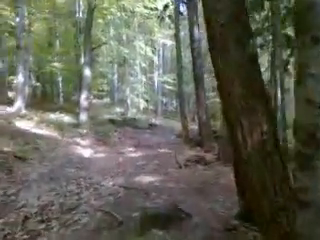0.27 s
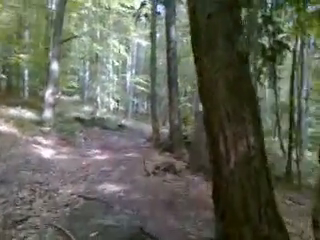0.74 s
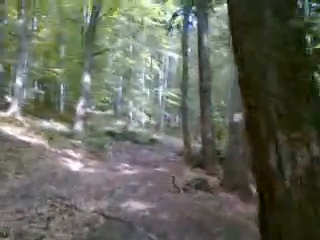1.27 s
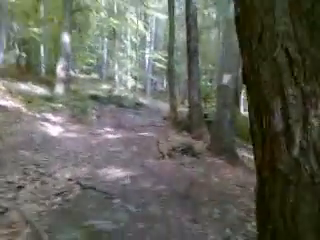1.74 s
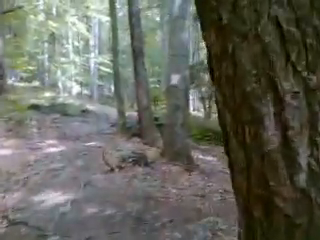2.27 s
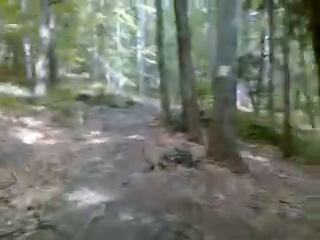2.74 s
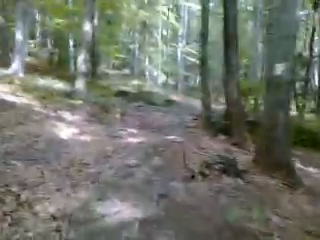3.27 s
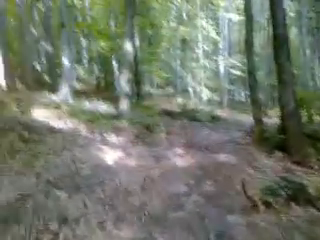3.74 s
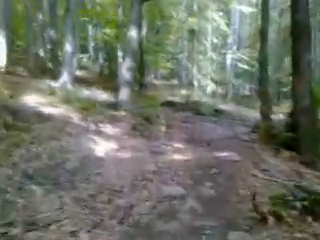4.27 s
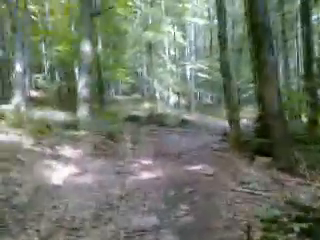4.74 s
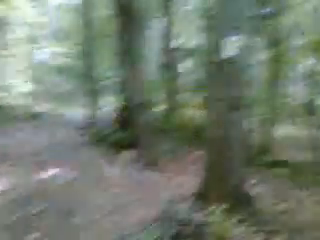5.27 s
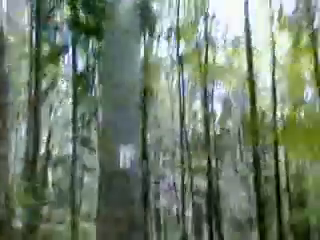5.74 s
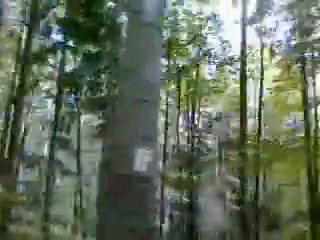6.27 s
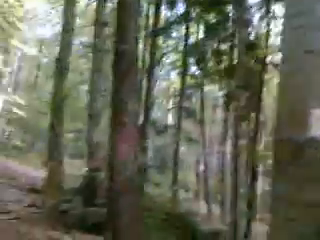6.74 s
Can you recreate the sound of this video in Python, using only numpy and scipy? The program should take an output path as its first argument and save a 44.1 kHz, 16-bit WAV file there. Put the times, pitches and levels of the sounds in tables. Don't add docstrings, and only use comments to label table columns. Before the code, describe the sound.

Uneven walking over crisp leaf litter, with sharp stick cracks, pebble knocks and dull heel thuds, and a bird's echoing chips, trill and buzzy flourish.

```python
import sys
import numpy as np
from scipy import signal
from scipy.fft import rfft, irfft, next_fast_len
from scipy.io import wavfile
from scipy.ndimage import uniform_filter1d, map_coordinates

SR = 44100
rng = np.random.default_rng(int(sys.argv[2]) if len(sys.argv) > 2 else 0)


def voltage_ratio(level):
    return 10 ** (np.asarray(level, float) / 20)


def to_wav(s):
    ch = np.atleast_2d(s).T
    pcm = np.round(np.clip(ch, -1, 1) * 32767)
    wavfile.write(sys.argv[1], SR, pcm.astype(np.int16))


N = 308372

# peak_s, length_s, leaf body level_db, crisp edges over body_db, grit over body_db
BURSTS = [(.589, 0.033, -45, -8.5, -32), (1.299, 0.081, -48.5, -11, -10.5), (1.389, 0.058, -38, -7, -7),
          (5.971, .02, -58, -6, 3), (2.361, 0.038, -44.5, -2, -17.5), (2.986, 0.025, -58, -7, -4),
          (2.789, 0.011, -66, 6.5, -4), (3.257, 0.0088, -51, 0, 4.5), (4.15, 0.1, -55.5, -3.5, -7.5),
          (4.109, 0.012, -39.5, -12, -20), (5.385, 0.036, -55.5, 1, -9), (6.67, 0.11, -52.5, 1, -8.5),
          (4.717, 0.13, -46, -4.5, -7.5), (4.781, 0.042, -39.5, -7, -12.5), (5.214, 0.1, -37, -5, -7.5),
          (5.492, 0.03, -47, -3.5, 0), (6.405, 0.042, -42.5, 1.5, -13.5), (6.795, 0.17, -52.5, -2.5, -3.5)]
CRUSHES = [(.81, 0.087, -54.5, -1, -12), (1.48, 0.059, -41, -4, -6), (1.715, 0.062, -36.5, -7, -6),
           (1.785, 0.1, -41, -2.5, -5), (1.855, 0.053, -38.5, -6.5, -8), (1.955, 0.014, -45, -8.5, -18),
           (1.993, 0.033, -44.5, -0.5, -16), (2.02, 0.029, -43, -0.5, -16.5), (2.15, 0.19, -56, -10.5, -15),
           (3.222, 0.041, -50, -4, -6), (4.05, 0.11, -66, -0.5, 2), (4.31, 0.036, -46.5, -4, -3.5),
           (4.365, 0.048, -40, -2.5, -9), (6.06, 0.1, -62, -6.5, -25), (5.57, .04, -56, -8, -10),
           (5.625, 0.052, -47, -1, -11.5), (5.692, 0.037, -44, -3, -4.5), (5.75, 0.079, -49.5, -1.5, -4),
           (5.82, 0.1, -54.5, 1, -9), (5.905, 0.055, -55.5, 4, -2.5), (6.025, 0.047, -48, 0, -4),
           (6.69, 0.028, -55, -3, -12), (6.428, .03, -43, -4, -10), (1.84, .03, -55, -8, 12),
           (5.53, 0.035, -44.5, 0.5, -10.5), (6.465, 0.077, -41.5, -4.5, -8.5),
           (6.555, 0.066, -49.5, -2.5, -8)]
BRUSHES = [(.23, 0.15, -62, -8, -8), (.578, 0.0077, -57.5, -2, -16), (3.246, 0.0083, -63, -12, -3),
           (1.925, .06, -47.5, -0.5, -23), (.995, 0.036, -45, -1.5, -0.5), (1.16, 0.06, -51, -7, -4),
           (1.6, 0.084, -55.5, 0.5, -4), (2.438, 0.044, -69.5, -5, 14), (2.785, 0.12, -78, 5, 11.5),
           (3.04, 0.05, -69, -9, 10.5), (3.095, 0.07, -53, -2.5, -12), (3.31, 0.091, -82, -8, 13),
           (3.408, 0.033, -56, -8.5, -1.5), (4.895, 0.032, -43, -3, -5.5), (4.94, 0.01, -53, -3.5, -9),
           (4.999, 0.048, -59.5, 1, -2.5), (5.328, 0.044, -42.5, -10, -24.5), (6.268, 0.061, -51.5, -5, -8),
           (6.755, 0.011, -67, -9, 10)]
SCUFFS = [(3.261, 0.011, -41, -1, -11.5), (3.546, 0.021, -54, -8, -4), (4.135, 0.022, -36, -6, -16),
          (4.493, 0.05, -49, -6, -11), (5.115, 0.03, -44, -8, -20), (2.884, .017, -55, -4, 4),
          (5.51, .025, -45, -3, -3), (5.17, 0.035, -49, -7, -22), (5.33, .042, -40.5, -6.5, -14.5),
          (6.222, 0.026, -62.5, -15, -0.5), (6.83, 0.048, -52.5, -5, -12),
          (3.998, 0.0057, -46, -12.5, -11.5), (.78, 0.015, -62, -8, 0)]
# start_s, peak_db, sharpness_db
SNAPS = [(.1605, -51, -10), (.2144, -28, -18.5), (.7477, -37.5, -14.5), (.811, -29, -17),
         (1.5404, -38, -10.5), (1.5655, -35.5, -9.5), (2.357, -43, -7), (2.6977, -50, -9),
         (2.821, -52, -23), (2.7656, -47.5, -15), (2.7865, -54.5, -0.5), (3.364, -33, -21),
         (3.7893, -57, -26), (3.9142, -44, -20), (3.98, -45.5, -17.5), (5.38, -42, -12), (6.412, -30, -15),
         (6.455, -30, -14), (6.477, -32, -14), (6.803, -34, -20), (4.8403, -41.5, -5), (4.999, -32.5, -14),
         (5.879, -38, -7.5), (6.113, -36, -14.5), (6.4029, -16.5, -27), (6.6687, -34, -15)]
# start_s, peak_db, sharpness_db, knock over snap_db, knock_hz
STICKS = [(0.583, -11, -9.5, -38, 2280), (1.293, -21, -25, -16, 610), (1.381, -18, -23, -7.5, 1510),
          (1.4482, -13, -21, 2, 2450), (3.252, -7, -18, -8, 1165), (4.116, -13, -14, -8, 1870),
          (4.521, -27, -18, -2, 1520), (4.693, -10.5, -18, -14, 2350), (4.712, -8, -17, -13, 1340),
          (4.7715, -0.5, -19, -20, 1700), (5.2087, -2.5, -18.5, -10.5, 1600),
          (6.3898, -25.5, -19.5, -13.5, 1070), (6.79, -20, -16, -8, 1110)]
# start_s, peak_db, pitch_hz
KNOCKS = [(.199, -40, 1030), (.333, -52, 961), (.157, -50, 650), (.216, -47, 1300), (.234, -55, 2000),
          (.284, -55, 750), (.525, -56, 900), (.876, -52, 1600), (.918, -52, 1000), (.768, -41, 1860),
          (.994, -44, 1770), (1.08, -40.5, 620), (1.168, -26, 900), (1.449, -26, 910), (1.065, -51, 650),
          (1.501, -33, 1220), (1.565, -32, 1810), (2.096, -46, 990), (2.181, -44, 1600), (2.668, -53, 610),
          (2.747, -47, 686), (2.752, -52, 770), (2.762, -48, 700), (2.808, -50, 1500), (2.79, -51, 600),
          (2.798, -52, 600), (2.823, -53, 650), (3.014, -56, 1940), (3.026, -43, 1750), (5.565, -44, 900),
          (5.708, -31, 1800), (2.875, -48, 1200), (3.044, -48, 1100), (3.06, -47, 1300), (2.993, -50, 2000),
          (3.709, -37, 500), (4.031, -41.5, 487), (4.217, -42.5, 1050), (4.363, -34.5, 920),
          (4.728, -30, 590), (4.888, -23, 1550), (5.0215, -32, 1740), (5.4755, -34, 1100),
          (5.487, -25, 755), (5.497, -28, 760), (5.5005, -28, 800), (5.5035, -27, 760), (5.974, -44, 810),
          (5.55, -42, 900), (1.698, -33, 1400)]
# start_s, peak_db, pitch_hz, t60_s
PINGS = [(.5235, -46, 1950, .01), (.583, -24, 2150, .009), (1.168, -33, 1800, .008),
         (5.9915, -30, 1800, .012), (2.881, -47, 2000, .012), (2.886, -47, 1850, .012),
         (3.461, -40, 950, .013), (4.6675, -37, 3850, .014), (4.762, -40, 3800, .012),
         (5.504, -36, 1950, .01), (3.709, -33, 950, .016), (3.709, -38, 1470, .014),
         (3.709, -40, 1950, .014)]
# start_s, peak_db, pitch_hz
THUDS = [(0.052, -42.5, 274), (0.157, -56, 264), (0.99, -45, 406), (1.129, -45, 390), (1.147, -52, 350),
         (.2, -51.5, 250), (0.284, -67, 402), (4.899, -48.5, 153), (1.162, -48, 300), (1.379, -38.5, 385),
         (2.074, -58, 183), (2.161, -50, 250), (2.433, -52.5, 468), (2.657, -46.5, 420),
         (2.765, -54.5, 517), (3.247, -39.5, 362), (3.351, -47, 194), (3.394, -42, 300), (3.405, -37, 230),
         (3.418, -42, 200), (3.458, -50, 183), (3.707, -39.5, 228), (4.028, -42, 301), (4.047, -50, 300),
         (4.058, -48, 210), (4.072, -51, 380), (4.092, -46, 200), (4.107, -45, 400), (4.214, -54, 180),
         (4.242, -55, 190), (4.592, -32.5, 185), (4.724, -39, 294), (5.207, -36.5, 452), (5.484, -54, 444),
         (5.893, -41.5, 285), (5.995, -26, 202), (6.557, -34.5, 226), (6.785, -41, 362), (6.877, -48, 187)]
# time_s, soil_db, buffet_db
GROUND = [(0.0, -87, -92), (1.4, -76, -86), (1.84, -70, -83), (1.9, -88, -88), (2.05, -88, -88),
          (2.12, -78, -88), (2.49, -85.5, -91.5), (4.67, -85.5, -88), (5.46, -84.5, -87), (5.5, -68, -90),
          (5.76, -68, -92), (5.98, -73, -87), (6.21, -78, -89), (6.38, -82, -88), (6.42, -68, -86),
          (6.64, -72, -86), (6.99, -85, -98)]
# peak_s, length_s, level_db
JOLTS = [(.06, .06, -92.5), (0.775, 0.025, -70), (0.996, 0.054, -89), (1.168, 0.033, -77), (1.46, .12, -74),
         (1.627, 0.068, -77), (1.82, .05, -86), (2.127, 0.072, -68), (3.29, 0.06, -70.5),
         (3.42, 0.043, -64), (3.727, 0.022, -70), (4.083, 0.09, -64), (4.383, 0.038, -71.5),
         (4.608, .04, -67), (4.75, 0.17, -75), (5.253, .05, -67.5), (5.5, 0.054, -78), (5.916, 0.037, -67),
         (6.01, 0.068, -66), (6.4, 0.04, -85), (6.574, 0.045, -68), (6.807, 0.057, -89)]

# start_s, level_db
CHIPS = [
    (.327, -64),
    (.471, -66),
    (.614, -52),
    (.76, -43),
]
# start_s, length_s, start_hz, end_hz, level_db
SLIDES = [
    (.26, .07, 6290, 5720, -72.5),
    (0.391, .07, 6230, 5750, -64),
    (0.682, .04, 6350, 5600, -59),
    (.735, 0.064, 6100, 5840, -57),
]
# falling note_db, landing pitch_hz, rising note_db
TRILL = [(-45, 3650, -40), (-43, 3800, -39), (-41, 3680, -37), (-39, 3750, -41), (-35, 3720, -42),
         (-36, 3780, -43), (-36, 3720, -45)]
# start_s, length_s, start_hz, end_hz, level_db
NOTES = [
    (1.215, 0.04, 3880, 3800, -39),
    (1.232, .017, 3900, 4800, -45.5),
    (1.24, 0.075, 4780, 4700, -49),
    (1.272, 0.019, 3420, 3680, -33),
    (1.774, 0.0087, 3730, 3830, -42),
    (1.848, 0.014, 3980, 3900, -50),
    (6.543, 0.097, 6600, 5670, -59),
]
BUZZES = [
    (1.289, 0.075, 3300, 2750, -43),
    (1.358, .27, 3644, 3347, -47.5),
    (1.895, 0.15, 3220, 4294, -42),
    (2.093, 0.082, 5490, 4620, -45.5),
    (2.175, 0.045, 4000, 3490, -45),
    (2.215, 0.09, 3625, 2846, -54),
]
CHEVRONS = [(6.572, .014, 4500, 5100, -55), (6.588, .016, 5150, 4700, -56), (6.727, .017, 4100, 5200, -46),
            (6.746, .023, 5000, 4100, -43), (6.871, .009, 5700, 4900, -48), (6.884, .01, 3400, 4100, -48),
            (6.888, .013, 3950, 4650, -40), (6.899, .007, 4800, 5600, -49),
            (6.907, .018, 4650, 3950, -36.5), (6.936, .016, 5150, 5800, -50)]
# time_s, echo over direct song_db
ECHO = [(0, 6), (.75, 5), (.85, .5), (1.2, .5), (1.4, 3), (3, 2.5), (7, -3)]
# frequency_hz, t60_s
TRUNKS = [(2500, 0.49), (4000, 0.33), (7000, 0.32)]

# frequency_hz, density_db per Hz
CRISP = [(3500, -54.5), (4800, 1.5), (5600, 7), (9000, -1)]
BODY = [(1500, -30), (2300, -8), (3000, -4), (4300, 0.5), (5200, -0.5), (6500, -41.5)]
GRIT = [(80, -35), (200, -15), (500, -6), (900, -1.5), (1800, 3), (2500, 0.5), (3500, -40)]
SPLINTER = [(3500, -54.5), (4800, 1.5), (5600, 7), (7000, 4), (9000, -8)]
CRUMB = [(60, -25.5), (130, -5), (250, -2.5), (500, -14), (900, -28), (2000, -38.5)]
SOIL = [(60, -37.5), (110, -11), (170, -10), (400, -7), (700, -15.5), (1500, -39)]
BUFFET = [(15, -24.5), (30, -9.5), (48, 1), (75, -5.5), (100, -10.5), (200, -59)]
HUSH = [(59, -42), (100, -9), (376, -18), (461, -9), (1150, -15), (1390, -10), (2430, -8), (3790, 1),
        (4840, -12), (6400, -1), (8620, -22), (11200, -62.5), (19000, -120)]
# frequency_hz, gain_db
MIC = [(60, -39), (105, -10.5), (170, -4.5), (1800, -7), (2660, -7.5), (3900, -1.5), (5200, -16),
       (6400, -3), (6800, -4), (7400, -9), (8500, -24.5), (9000, -35), (10000, -100)]
# frequency_hz, width_hz
NULLS = [(7010, 210), (8000, 330), (8000, 170)]


def along(points, hz):
    f, v = np.transpose(points)
    return np.interp(np.log(hz + 1), np.log(f + 1), v)


def curves(rows):
    s, *cols = np.transpose(rows)
    return [np.interp(np.arange(N) / SR, s, c) for c in cols]


def unit(x):
    return x / np.sqrt(np.mean(x ** 2) + 1e-20)


def wobble(rate):
    knots = rng.standard_normal(int(N * rate / SR) + 4)
    return map_coordinates(knots, [np.arange(N) * rate / SR])


def coloured(x, gain_db):
    m = 2 * next_fast_len(N // 2 + 4096)
    gain = voltage_ratio(gain_db(np.fft.rfftfreq(m, 1 / SR)))
    cepstrum = irfft(np.log(gain + 1e-6), m)
    causal = np.concatenate([cepstrum[:1], 2 * cepstrum[1:m // 2], np.zeros(m // 2)])
    return irfft(rfft(x, m) * np.exp(rfft(causal)), m)[:N]


def add(track, s, sound):
    part = track[round(s * SR):][:len(sound)]
    part += sound[:len(part)]


def crackle(spectrum, rate, spread_db, grainy):
    happens = rng.random(N) < rate / SR
    breaks = happens * voltage_ratio(spread_db * rng.exponential(size=N)) * rng.standard_normal(N)
    mix = grainy * unit(breaks) + rng.standard_normal(N)
    return unit(coloured(mix, lambda hz: along(spectrum, hz)))


def patchy(x, depth_db):
    z = signal.stft(x, nperseg=256)[2]
    field = uniform_filter1d(rng.standard_normal(z.shape), size=4, axis=0)
    field = uniform_filter1d(field, size=14, axis=1)
    return unit(signal.istft(z * voltage_ratio(depth_db * unit(field)), nperseg=256)[1][:N])


def tread():
    fade_db, settle_db, settle_db_per_s = 22, -27.5, 108
    kinds = [(BURSTS, 0.34, 1.065), (CRUSHES, 1.11, 1.88), (BRUSHES, 1.31, 1.01), (SCUFFS, 1.05, 4.5)]
    s = np.arange(0, N / SR + .01, .001)
    total = voltage_ratio(-110.)
    for rows, rise, roundness in kinds:
        peak_s, length, db, crisp_db, grit_db = np.transpose(rows)[..., None]
        t = s - peak_s
        side_s = length * np.where(t < 0, rise, 1)
        load = voltage_ratio(-fade_db * (abs(t) / side_s) ** roundness)
        load = load + (t > 0) * voltage_ratio(settle_db - settle_db_per_s * abs(t))
        layers = [(voltage_ratio(db + over) * load).sum(axis=0) for over in (0, crisp_db, grit_db)]
        total = total + np.array(layers)
    return curves(np.column_stack([s, *(20 * np.log10(total))]))


def litter():
    body_db, crisp_db, grit_db = tread()
    press_db = 1.8 * wobble(45) + 1.13 * wobble(160)
    crisp = patchy(crackle(CRISP, 1400, spread_db=3.0, grainy=0.58), depth_db=2.5)
    body = patchy(crackle(BODY, 1500, spread_db=0.5, grainy=0.68), depth_db=2.0)
    grit = patchy(crackle(GRIT, 900, spread_db=2.5, grainy=0.51), depth_db=3.5)
    mix = voltage_ratio(crisp_db + 11) * crisp + voltage_ratio(body_db + 3.5) * body + voltage_ratio(grit_db + 6.5) * grit
    return voltage_ratio(press_db) * mix


def snaps():
    dull, sharp, t = np.zeros(N), np.zeros(N), np.arange(SR // 10) / SR
    breaks = SNAPS + [stick[:3] for stick in STICKS]
    splinters, spray = voltage_ratio(-14 - 60 * t / .004), voltage_ratio(-33 - 60 * t / .05)
    for s, db, sharp_db in breaks:
        burst = (splinters + spray) * rng.standard_normal((2, len(t)))
        burst[:, 0] = 1
        add(dull, s, voltage_ratio(db + 16.0) * burst[0])
        add(sharp, s, voltage_ratio(db + sharp_db + 27.0) * burst[1])
    dull = coloured(dull, lambda hz: along(BODY, hz))
    return dull + coloured(sharp, lambda hz: along(SPLINTER, hz))


def knocks():
    bend_s = .0006
    out, t = np.zeros(N), np.arange(SR // 20) / SR
    hits = KNOCKS + [(s - bend_s, db + over_db, hz) for s, db, _, over_db, hz in STICKS]
    for s, db, hz in hits:
        cycles = hz * t
        ring = np.cos(2 * np.pi * cycles) * voltage_ratio(-13 * cycles)
        ring += 0.29 * np.sin(2 * np.pi * 1.95 * cycles) * voltage_ratio(-17 * cycles)
        ring *= 1 - np.exp(-cycles / 0.52)
        late, weaker = rng.random(2)
        add(out, s, voltage_ratio(db + 13) * ring)
        add(out, s + .001 + 0.00286 * late, -voltage_ratio(db + 7 - 10 * weaker) * ring)
    return coloured(out, lambda hz: along([(80, -24), (400, 1.0)], hz))


def pings():
    out, t = np.zeros(N), np.arange(SR // 20) / SR
    for s, db, hz, t60 in PINGS:
        envelope = voltage_ratio(db + 9 - 60 * t / t60) * (1 - np.exp(-t / .0008))
        add(out, s, envelope * np.sin(2 * np.pi * hz * t))
    return out


def thuds():
    out, earth, t = np.zeros(N), np.zeros(N), np.arange(SR // 4) / SR
    rise = 1 - np.exp(-t / 0.0029)
    for s, db, hz in THUDS:
        cycles = hz * (t + 0.33 * 0.0033 * (1 - np.exp(-t / 0.0017)))
        add(out, s, voltage_ratio(db + 9.5 - 60 * t / 0.032) * rise * np.sin(2 * np.pi * cycles))
        add(earth, s, voltage_ratio(db - 2.0 - 60 * t / 0.075) * rise)
    return out + earth * crackle(CRUMB, 500, spread_db=2.5, grainy=.9)


def ground():
    level_db = curves(GROUND)[0] + 6.5 + wobble(25)
    return voltage_ratio(level_db) * crackle(SOIL, 250, spread_db=2.5, grainy=.9)


def whistle(length, from_hz, to_hz, db, warble_hz=0, bend=1.2):
    t = np.arange(round(length * SR)) / SR
    strokes = signal.sawtooth(2 * np.pi * 95 * t, .3)
    hz = to_hz + (from_hz - to_hz) * (1 - t / length) ** bend + warble_hz * strokes
    swell = np.sin(np.pi * t / length) ** 1.1
    return voltage_ratio(db + 3) * swell * np.sin(2 * np.pi * np.cumsum(hz) / SR)


def song():
    out = np.zeros(N)
    for s, db in CHIPS:
        add(out, s, whistle(0.024, 5150, 3200, db, bend=.5))
    for s, *note in SLIDES:
        add(out, s, whistle(*note, warble_hz=280))
    first_s, beat_s = .823, .0572
    for k, (fall_db, land_hz, rise_db) in enumerate(TRILL):
        s = first_s + k * beat_s
        add(out, s - .003, whistle(.016, land_hz + 650, land_hz - 30, fall_db, bend=4.5))
        add(out, s + 0.012, whistle(.019, 2850, 3500, rise_db, bend=1.7))
    for s, *note in NOTES + CHEVRONS:
        add(out, s, whistle(*note))
    for s, *note in BUZZES:
        add(out, s, whistle(*note, warble_hz=0.17 * min(note[1], 4500)))
    return out


def trunks(x):
    out, step = np.zeros(N + SR), SR // 8
    for k in range(0, N, step):
        piece = x[k:k + step]
        if not piece.any():
            continue
        hz, t, z = signal.stft(rng.standard_normal(SR // 2), SR, nperseg=256)
        decay = (1 - np.exp(-t / 0.01)) * voltage_ratio(-60 * t / along(TRUNKS, hz)[:, None])
        tail = signal.istft(z * decay, SR, nperseg=256)[1]
        add(out, k / SR + .006, signal.fftconvolve(piece, tail / np.linalg.norm(tail)))
    return out[:N]


def finch():
    flutter_db, slap_s, slap_db, shimmer_rad = 2.2, .0225, -16, .75
    direct = song() * voltage_ratio(flutter_db * wobble(220))
    slap = voltage_ratio(slap_db) * np.roll(direct, round(slap_s * SR))
    echo = signal.hilbert(trunks(direct), next_fast_len(N))[:N]
    echo = echo * np.exp(1j * shimmer_rad * wobble(800))
    return direct + slap + voltage_ratio(curves(ECHO)[0]) * echo.real


def buffet():
    s, length, db = np.transpose(JOLTS)[..., None]
    t = np.arange(0, N / SR + .01, .002)
    jolts = voltage_ratio(db - 0.5 - 24 * ((t - s) / length) ** 2).sum(axis=0)
    shake, = curves(np.column_stack([t, jolts]))
    air = voltage_ratio(curves(GROUND)[1] - 1.5 + 2.0 * wobble(7.0))
    return (air + shake) * crackle(BUFFET, 30, spread_db=1.0, grainy=0.29)


def hush():
    return voltage_ratio(-75 + 0.58 * wobble(2.2)) * crackle(HUSH, 300, spread_db=3.0, grainy=0.28)


def scene():
    steps = litter() + snaps() + knocks() + pings() + thuds() + ground()
    return (steps + finch())[None]


def band_limit(x):
    return signal.sosfilt(signal.butter(12, 8770, fs=SR, output="sos"), x)


def record(dry):
    x = coloured(dry[0], lambda hz: along(MIC, hz)) + buffet() + hush()

    def notches_db(hz):
        return sum(-10 * np.log10(1 + (width / (abs(hz - centre) + 1)) ** 2) for centre, width in NULLS)

    x = coloured(x, notches_db)
    return band_limit(x[None])


dry = scene()
out = record(dry)
to_wav(out)
```